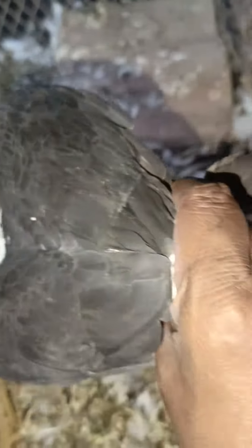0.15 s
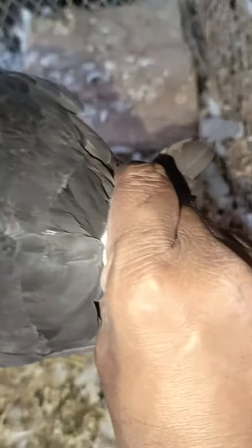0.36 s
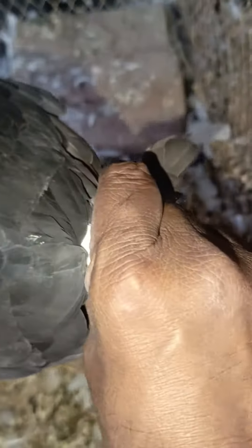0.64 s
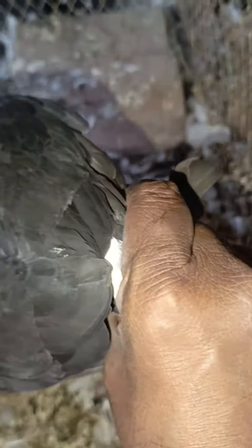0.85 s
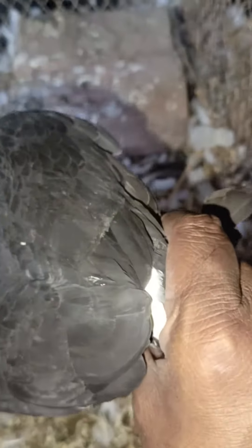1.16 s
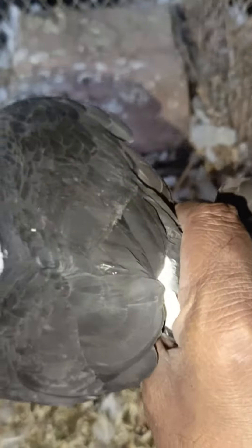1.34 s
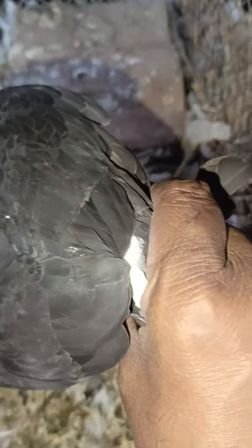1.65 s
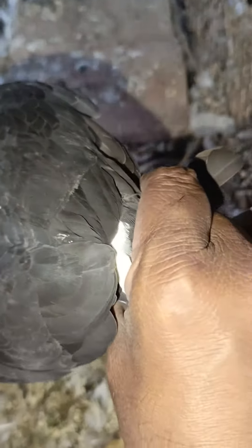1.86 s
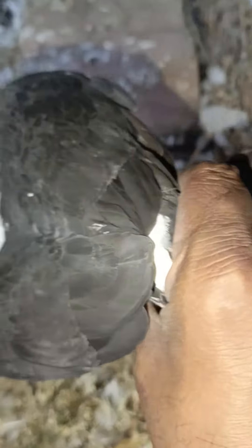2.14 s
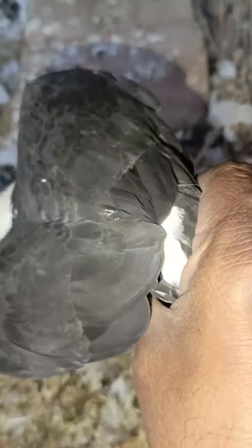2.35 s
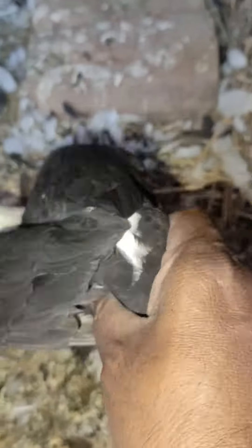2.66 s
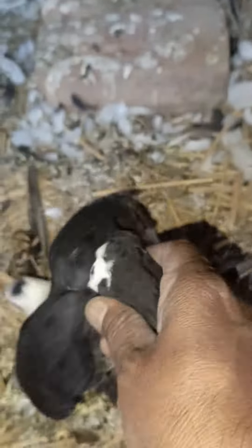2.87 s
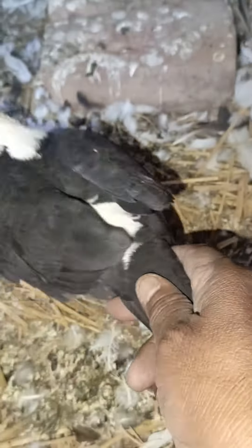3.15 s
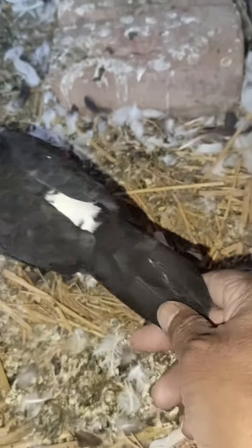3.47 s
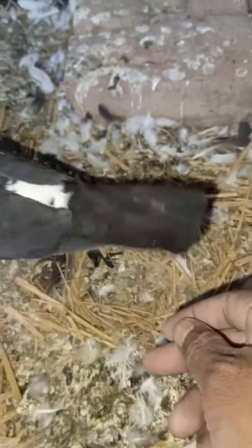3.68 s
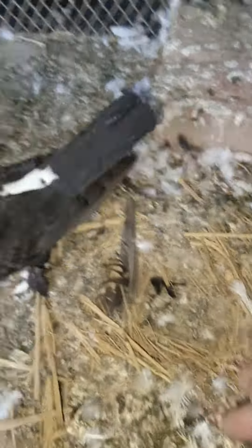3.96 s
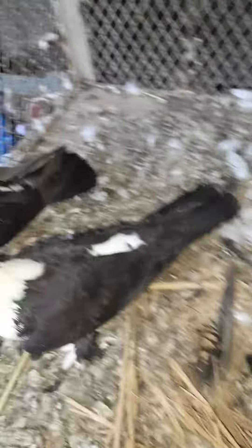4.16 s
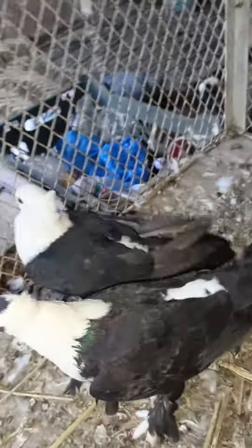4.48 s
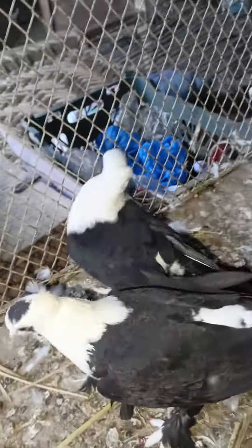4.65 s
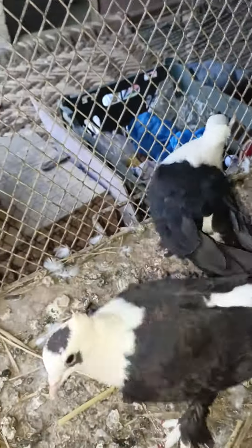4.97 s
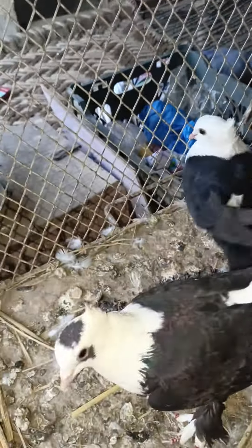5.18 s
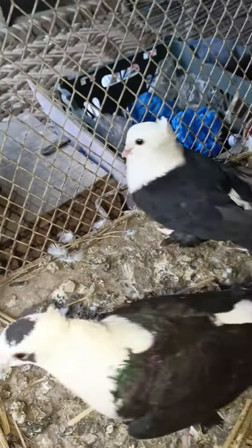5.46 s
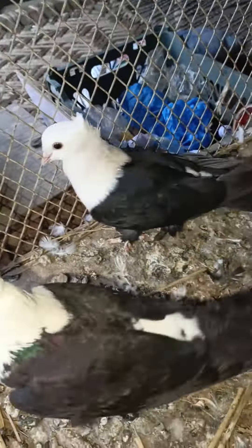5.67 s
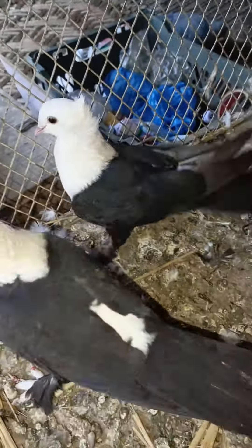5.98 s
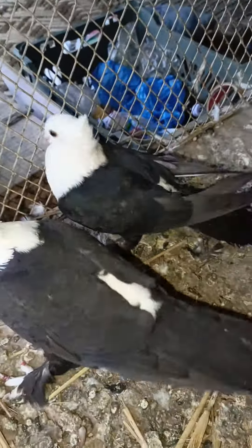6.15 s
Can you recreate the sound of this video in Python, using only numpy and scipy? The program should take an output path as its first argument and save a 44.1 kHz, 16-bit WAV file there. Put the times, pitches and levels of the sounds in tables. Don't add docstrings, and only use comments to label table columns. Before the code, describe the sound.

Short harsh bird screeches and quick chirps burst over low pigeon coos, straw rustling and mesh knocks in a hard-walled cage.

```python
import sys
import numpy as np
from scipy import signal
from scipy.io import wavfile
from scipy.ndimage import uniform_filter1d

SR = 44100
rng = np.random.default_rng(int(sys.argv[2]) if len(sys.argv) > 2 else 0)


def dump(signal):
    limited = np.clip(np.atleast_2d(signal).T, -1, 1)
    pcm = np.round(limited * 32767).astype(np.int16)
    wavfile.write(sys.argv[1], SR, pcm)


def volts_from_decibels(level):
    exponent = np.asarray(level, float) / 20
    return 10 ** exponent


N = 278712

# time in seconds, level in dB.
MURMUR = [(0.0, -29), (0.56, -32.5), (1.37, -32), (2.34, -34), (2.73, -32), (3.4, -37.5), (3.98, -31),
          (4.22, -33), (4.96, -34), (5.9, -33), (6.32, -39)]
# frequency in Hz, density in dB per Hz.
AIR = [(15, -60), (25, -74), (59, -25.5), (145, -8.5), (317, -3), (451, -1.5), (775, -14.5), (2410, -29),
       (4740, -22), (11600, -42.5), (13600, -83), (14800, -22), (16000, -35)]
AIR_DB = -34
# peak in seconds, reach in seconds, level in dB.
GUSTS = [(.15, 0.32, -45.5), (.55, 0.19, -50), (1.622, 0.18, -44), (2.13, 0.073, -58), (2.96, 0.069, -55),
         (2.27, .12, -50), (1.31, .05, -48), (2.75, .05, -54), (3.57, .04, -55), (4.8, .1, -55),
         (5.02, 0.1, -47), (5.2, 0.073, -49), (5.8, 0.24, -46.5), (6.0, 0.057, -42)]
CALM_DB = -68

# start in seconds, length in seconds, pitch in Hz, level in dB.
HOOTS = [(0., 0.098, 462, -23.5), (0.037, 0.13, 296, -32), (0.8, 0.035, 677, -30),
         (1.329, 0.17, 251, -38.5), (1.558, 0.091, 295, -30.5), (3.69, 0.16, 331, -31.5),
         (3.848, 0.35, 265.8, -31.5), (4.02, 0.1, 473, -28), (4.296, 0.11, 392, -34.5),
         (4.476, 0.27, 294.3, -33), (5.335, 0.38, 260, -39.5), (6.097, 0.044, 214, -34)]
# start in seconds, length in seconds, first and last pitch in Hz, level in dB.
ROLLS = [(0.896, 0.13, 337, 398, -30), (1.045, 0.35, 368.5, 331, -30.5), (1.707, 0.098, 389, 338, -36),
         (2.044, 0.11, 380.5, 354, -35), (2.203, 0.12, 358, 327, -35.5), (2.486, 0.063, 363, 349, -26),
         (2.562, 0.096, 382.3, 347, -24.5), (2.672, 0.17, 333.2, 388, -29), (2.93, 0.11, 449.6, 432, -30.5),
         (3.007, 0.179, 388.2, 364.3, -25), (4.791, 0.243, 322, 314.4, -32.5),
         (5.239, .16, 333.2, 366, -30.5), (5.422, 0.13, 351, 332, -31), (5.674, 0.15, 383.8, 349, -30.5),
         (5.805, 0.22, 425.5, 331.6, -28.5)]
ROLL_PEAK, ROLL_START_DB, ROLL_END_DB = 1, 3.5, -5.5

# peak in seconds, reach in seconds, shuffle in dB,
# near fizz in dB against the shuffle.
SCUFFLES = [(.0, 0.39, -39.5, -8), (.18, 0.047, -38, -23), (.56, 0.17, -33.5, -8), (.92, 0.14, -29, -10.5),
            (1.311, 0.017, -40, -20), (1.51, 0.12, -36, -9.5), (1.7, 0.051, -34.5, -13),
            (1.94, 0.15, -32, -8), (2.08, 0.11, -36, -22), (2.36, 0.091, -43, -15),
            (2.78, 0.47, -40, -11.5), (3.08, 0.16, -60, -21), (3.27, 0.053, -43.5, 4),
            (3.782, 0.053, -41.5, -13), (4.16, 0.063, -31, -11), (4.3, 0.098, -40, -17),
            (4.52, 0.13, -55, 3.5), (4.73, 0.14, -42, -25), (4.88, 0.26, -58, -5), (5.35, 0.25, -54, -8.5),
            (5.7, 0.6, -51.5, -8), (5.88, 0.12, -41, -9), (1.2, .1, -52, -10), (4.97, .08, -52, -10),
            (6.15, 0.083, -40.5, -10)]
BOUT_DROP_DB = -8
STILL_DB, STILL_FIZZ_DB = -58.5, -76
# frequency in Hz, density in dB per Hz.
STRAW = [(35, -26), (60, -27), (124, -5), (202, -21.5), (294, -4), (785, -11.5), (1200, -9.5), (1470, -12),
         (2300, -3), (3580, -11), (6430, -23.5), (11000, -42), (16000, -26)]

# start in seconds, snap in dB, thump in dB.
TAPS = [(0.0318, -25, -29.5), (0.0544, -27.5, -28), (0.1915, -13, -18), (0.2793, -23.5, -26.5),
        (0.3526, -28.5, -30.5), (0.3884, -27, -31.5), (0.5671, -38, -21.5), (1.7065, -24, -21.5),
        (2.5684, -61.5, -32), (2.6065, -29.5, -30), (2.6544, -30.5, -33.5), (2.9134, -16.5, -24.5),
        (3.7309, -36.5, -37), (.0957, -30, -33), (.173, -26, -30), (1.8622, -26, -36), (2.582, -44, -38),
        (3.09, -39, -40), (5.3502, -33, -37), (5.37, -36, -40), (5.392, -29, -44), (5.44, -34, -40),
        (5.458, -34, -40), (5.68, -36, -40), (5.71, -39.5, -37), (2.8794, -25, -42), (5.1253, -31, -48),
        (5.5937, -30, -31.5), (5.6176, -31, -33)]
# start in seconds, snap in dB, thump in dB.
SCUFFS = [(0.1201, -23.5, -25), (0.5362, -18.5, -31), (1.3264, -24.5, -28), (1.3488, -26, -30.5),
          (1.4614, -30, -35), (1.4964, -23.5, -27), (1.5614, -26, -25), (1.6342, -16, -18),
          (1.8302, -45, -35), (2.3785, -26, -64), (2.5481, -33, -43), (2.9744, -40, -26),
          (3.1314, -37.5, -30.5), (4.3344, -22, -28), (4.5344, -24, -46), (4.8094, -39, -30),
          (5.0185, -33.5, -38), (6.0367, -30.5, -34), (6.2856, -36.5, -41)]
TAP_T60_S, SCUFF_T60_S = 0.042, 0.2
TAP_TICK, SCUFF_TICK = 2.3, 1.2

# start in seconds, length in seconds, first pitch in Hz, last pitch in Hz,
# peak effort in dB. All call tables down to SLUMPS have these columns.
SCREECHES = [
    (0.706, 0.11, 1153, 1193, -14),
    (1.871, 0.12, 1097, 1192, -14.5),
    (2.036, 0.1, 1185, 1220, -14),
    (3.272, 0.12, 1127, 1208, -13.5),
    (3.418, 0.118, 1147, 1222, -14.5),
    (5.749, 0.13, 1125, 1169, -29.5),
]
RASPS = [(.11, 0.12, 1450, 1405, -32), (.612, 0.12, 1207, 1464, -22), (.893, 0.07, 1245, 1481, -19.5),
         (.95, 0.083, 1434, 1352, -21.5), (4.16, 0.067, 1272, 1474, -18), (4.215, 0.085, 1251, 1416, -18.5),
         (4.432, .16, 1203, 1456, -21.5), (4.5, 0.055, 1568, 1500, -27), (4.436, .12, 1165, 1181, -25),
         (.62, .09, 1160, 1175, -29), (5.145, 0.057, 1765, 1790, -32)]
PEEPS = [
    (.4, 0.071, 2925, 2797, -23),
    (.43, 0.058, 3910, 3950, -29.5),
    (2.805, 0.079, 2460, 2690, -24),
    (2.85, 0.05, 3130, 3220, -23),
    (4.633, 0.019, 2840, 3430, -15),
    (4.643, 0.025, 3460, 3470, -16),
    (4.662, 0.0092, 3440, 2730, -11),
]
MEWS = [
    (5.33, .2, 1780, 1888, -32),
]
SWELLS = [
    (2.71, 0.11, 2100, 2320, -31),
    (3.1, 0.2, 3040, 2797, -32),
    (3.15, 0.077, 2040, 2340, -32),
    (3.21, .065, 3000, 2820, -28),
]
SWOOPS = [
    (3.912, .093, 1749, 2423, -15),
    (4.205, 0.0645, 2295, 2505, -19.5),
]
STACKS = [
    (.44, 0.151, 1132, 1098, -19.5),
]
GROANS = [
    (3.885, 0.048, 830, 845, -22.5),
    (4.065, 0.092, 815, 852.6, -27),
    (3.16, .08, 940, 915, -42),
]
SQUAWKS = [
    (4.619, 0.02, 1370, 1382, -14.5),
    (4.669, 0.025, 1356, 1290, -18),
]
PIPES = [(.78, .08, 2000, 1950, -32), (.9, .08, 1750, 1600, -32), (2.13, .042, 2485, 2606, -23),
         (2.46, .069, 4730, 4460, -50), (2.77, .07, 2300, 2250, -32), (3.725, .079, 1950, 1800, -39),
         (4.07, .084, 2200, 2300, -38), (4.705, .016, 1770, 1700, -28), (4.74, .03, 3200, 2800, -35),
         (4.765, .065, 3300, 1800, -37), (5.045, .06, 1518, 1478, -44), (5.06, .061, 4820, 4770, -46),
         (5.165, .05, 3310, 2110, -41), (5.757, .13, 2300, 2330, -36)]
DIVES = [
    (1.125, .041, 3410, 2540, -35),
    (2.178, .088, 2677, 1503, -16),
    (4.0, .06, 2390, 1753, -17),
    (4.005, .031, 3130, 2380, -26),
    (5.14, .031, 5000, 3370, -33.5),
]
SLUMPS = [
    (4.295, .05, 1450, 1110, -20),
    (4.318, .03, 3600, 2800, -25),
    (4.522, .025, 5300, 4300, -23),
    (4.598, .024, 3150, 2760, -27),
]
YELP_AFTER_S, YELP_S, YELP_HZ, YELP_END_HZ, YELP_DB = .021, .05, 3800, 3150, -6

# peak as share of length, pitch travelled by then as share,
# start in dB, end in dB, overtone fall in dB per octave, odd overtones in dB.
SCREECH = (0.4, 0.8, -5, -15, 1, 0)
RASP = (0.32, 1.17, -2, -7, 2.5, -6.5)
PEEP = (0.64, 0.96, -5, -7.5, 2.5, -4)
MEW = (0.28, 0.66, -4.5, -12, 0, 7)
SWELL = (0.57, 1, -13, -3, -10.5, 20)
SWOOP = (0.5, 0.9, -1, -1, -5.5, -0.5)
YELP = (0.4, .75, -1, -2, 1.5, -3)
STACK = (0.64, 0.7, -8, -16, 0.5, 1.5)
GROAN = (.5, 1, 3, 2.5, -10.5, 1)
SQUAWK = (-1, 0.8, -7, -7, 0.5, 1)
PIPE = (-0.5, 0.04, 8.5, -9.5, -9.5, 9)
DIVE = (.45, .55, -1, -5, -3.5, -7)
SLUMP = (.45, .45, -2, -4, -2, -3)
HOARSE = dict(screech=.3, rasp=.34, peep=.26, mew=.28, swell=.36, swoop=.36, yelp=.32, stack=.06, groan=.21, squawk=.24, pipe=.24, dive=.22, slump=.2)
# favoured frequency in Hz, lift in dB, onset in seconds, echo in dB.
THROAT = dict(screech=(4750, 9.5, .019, -3.5), rasp=(2900, 2.5, .007, -5), peep=(3100, 0, 0, -6),
          mew=(1850, 5.5, 0.06, -4), swell=(2400, 5, 0.1, -2.5), swoop=(2400, 4.5, .02, -4.5),
          yelp=(3398, 3, 0.03, -3), stack=(4450, 6, 0, -3.5), groan=(1900, 4, .011, -4.5),
          squawk=(3500, -0.5, -0.03, -8), pipe=(2200, 8, -0.04, -3.5), dive=(3696, 5, 0.06, -3.5),
          slump=(2600, 5, .004, -6))
THROAT_OCTAVES = 0.28
# frequency in Hz, gain in dB.
BEAK = [(410, -62), (700, -32.5), (1180, -11.5), (2350, -8.5), (2770, -1), (3070, -4), (4100, -2.5),
        (4860, -1), (5470, -8), (6570, -9.5), (8530, -25.5), (12000, -31), (14800, -34.5), (16000, -21)]

DUCK_FROM_DB, DUCK_SHARE, DUCK_BACK_DB_PER_S = -24.5, 0.22, 36
GATE_REACH_DB, GATE_DEPTH_DB, GATE_FROM_HZ = 5, 2.8, 650


def evened(x):
    return x / np.sqrt(np.mean(x ** 2) + 1e-20)


def colour(x, points):
    point_hz, point_db = np.transpose(points)
    hz = abs(np.fft.fftfreq(4096, 1 / SR))
    gain_db = np.interp(np.log(hz + 1), np.log(point_hz), point_db)
    log_gain = np.log(volts_from_decibels(np.maximum(gain_db, -100)))
    taps = np.fft.ifft(np.exp(np.conj(signal.hilbert(log_gain)))).real[:2048]
    return signal.oaconvolve(x, taps)[:len(x)]


def band(x, low_hz, high_hz):
    edges_hz = [low_hz, min(high_hz, SR / 2 - 1000)]
    return signal.sosfilt(signal.butter(2, edges_hz, "band", fs=SR, output="sos"), x)


def wander(count, hz):
    knots = rng.standard_normal(count // 8 + 2)
    path = np.interp(np.arange(count) * hz / SR, np.arange(len(knots)), knots)
    return uniform_filter1d(path, max(int(SR / hz / 2), 1))


def spread(rows):
    s, *columns = np.transpose(rows)
    t = np.arange(s[0], s[-1], 1 / SR)
    return [np.interp(t, s, c) for c in columns]


def add(mix, s, sound):
    part = mix[round(s * SR):][:len(sound)]
    part += sound[:len(part)]


def arch(s, length, first_hz, last_hz, level_db, peak, bend, start_db, end_db):
    peak_s = s + np.clip(peak, .05, .95) * length
    peak_hz = first_hz + bend * (last_hz - first_hz)
    return [(s, first_hz, level_db + start_db), (peak_s, peak_hz, level_db),
            (s + length, last_hz, level_db + end_db)]


def bouts(s, reach, level_db, still_db):
    t = np.arange(0, N / SR + .01, .002)
    away = abs(t[:, None] - s) / np.maximum(reach, .01)
    power = volts_from_decibels(2 * still_db) + volts_from_decibels(2 * (level_db + BOUT_DROP_DB * away ** 1.47)).sum(axis=1)
    return np.interp(np.arange(N) / SR, t, 10 * np.log10(power))


def flock():
    z = signal.stft(colour(rng.standard_normal(N), AIR), nperseg=1024)[2]
    patches = uniform_filter1d(rng.standard_normal(z.shape), 5, axis=0)
    patches = evened(uniform_filter1d(patches, 5, axis=1))
    wash = evened(signal.istft(z * volts_from_decibels(2.7 * patches), nperseg=1024)[1][:N])
    draught = evened(band(wash, 36, 102)) * volts_from_decibels(2 * wander(N, 9.7))
    draught *= volts_from_decibels(bouts(*np.transpose(GUSTS), CALM_DB))
    murmur_db = np.interp(np.arange(N) / SR, *np.transpose(MURMUR))
    murmur = volts_from_decibels(murmur_db) * band(band(wash, 121, 485), 121, 690)
    air = volts_from_decibels(AIR_DB - 14 + 1.1 * wander(N, 4.)) * band(wash, 400, 20000)
    return draught + murmur + air


def hoot(length, hz, level_db):
    count = round(length * SR)
    turns = np.cumsum(hz * (1 + 0.035 * wander(count, 25.0))) / SR
    tone = np.sqrt(2) * np.sin(2 * np.pi * turns)
    return volts_from_decibels(level_db + 0.94 * wander(count, 26.4)) * tone * signal.windows.tukey(count, .4)


def rustle():
    s, reach, level_db, bright_db = np.transpose(SCUFFLES)
    fizz_db = bouts(s, reach, level_db + bright_db, STILL_FIZZ_DB)
    shuffle_db = bouts(s, reach, level_db, STILL_DB)
    crack_size = volts_from_decibels(7.5 * np.minimum(rng.exponential(1, N), 5))
    crackle = crack_size * (rng.random(N) < 1500 / SR) * rng.choice([-1, 1], N)
    stir = (.5 * evened(crackle) + rng.standard_normal(N)) * volts_from_decibels(3.2 * wander(N, 45.))
    straw = colour(stir, STRAW)
    fizz = 4.05 * evened(band(straw, 2430, 18000))
    shuffle = 1.904 * evened(band(straw, 240, 3590))
    return volts_from_decibels(fizz_db) * fizz + volts_from_decibels(shuffle_db) * shuffle


def knock(snap_db, thump_db, t60, tick):
    t = np.arange(round(.3 * SR)) / SR
    burst = colour(rng.standard_normal(len(t)), STRAW)
    snap = evened(band(burst, 3950, 24600))
    thump = evened(band(burst, 113, 2780))
    snap[40] += 4.0
    decay = volts_from_decibels(-60 * t / max(t60, .01)) + tick * volts_from_decibels(-60 * t / 0.013)
    decay *= np.minimum(t / 0.0023, 1)
    return decay * (0.53 * volts_from_decibels(snap_db) * snap + 0.82 * volts_from_decibels(thump_db) * thump)


def chirp(rows, hoarse, fall_db, odd_db, throat_hz, lift_db, onset):
    hz, effort_db = spread(rows)
    count = len(hz)
    t = np.arange(count) / SR
    turns = np.cumsum(hz * (1 + (.003 + .085 * hoarse) * wander(count, 300.))) / SR
    tone = np.zeros(count)
    for k in range(1, 15):
        throat_db = lift_db * np.exp(-(np.log2(k * hz / throat_hz) / THROAT_OCTAVES) ** 2)
        overtone_db = fall_db * np.log2(k) + odd_db * (k % 2) + 3.17 * wander(count, 88.8) + throat_db
        tone += volts_from_decibels(overtone_db) * np.cos(2 * np.pi * k * turns) * (k * hz < 16000)
    puffs = (0.29 + np.exp(-(turns % 1) / 0.71)) * rng.standard_normal(count)
    puffs = colour(puffs, [(1000, 0), (16000, 4 * fall_db)])
    breath = np.minimum(t / 0.0048, 1)
    hiss = hoarse * breath * evened(band(colour(puffs, BEAK), .8 * hz.min(), 20000))
    voice = (1 - hoarse) * evened(colour(tone, BEAK)) + .9 * hiss
    flutter = volts_from_decibels(12.4 * hoarse * wander(count, 117.0))
    opening = np.minimum(t / max(onset, .002), 1)
    fade = signal.windows.tukey(count, min(0.013 * SR / count, 1))
    return opening * volts_from_decibels(effort_db) * evened(voice * flutter) * fade


def small_birds():
    yelps = [(s + YELP_AFTER_S, YELP_S, YELP_HZ, YELP_END_HZ, db + YELP_DB) for s, *_, db in SCREECHES]
    kinds = dict(screech=(SCREECHES, SCREECH), rasp=(RASPS, RASP), peep=(PEEPS, PEEP), mew=(MEWS, MEW),
                 swell=(SWELLS, SWELL), swoop=(SWOOPS, SWOOP), yelp=(yelps, YELP), slump=(SLUMPS, SLUMP),
                 stack=(STACKS, STACK), groan=(GROANS, GROAN), squawk=(SQUAWKS, SQUAWK),
                 pipe=(PIPES, PIPE), dive=(DIVES, DIVE))
    near, far = np.zeros((2, N))
    for name, (calls, (*shape, fall_db, odd_db)) in kinds.items():
        *throat, echo_db = THROAT[name]
        for row in calls:
            call = chirp(arch(*row, *shape), HOARSE[name], fall_db, odd_db, *throat)
            add(near, row[0], call)
            add(far, row[0], volts_from_decibels(echo_db) * call)
    return band(np.array([near, far]), 330, 17000)


def roll(rows):
    hz, level_db = spread(rows)
    count = len(hz)
    beat = np.cumsum(23.64 * (1 + 0.34 * wander(count, 17.2))) / SR
    throb = 1 + 0.5 * np.cos(2 * np.pi * beat)
    turns = np.cumsum(hz * (1 + 0.085 * wander(count, 35.))) / SR
    tone = np.sin(2 * np.pi * turns) + volts_from_decibels(-27.5) * np.sin(4 * np.pi * turns)
    level = volts_from_decibels(level_db + 1.9 * wander(count, 11.0))
    return level * evened(throb * tone) * signal.windows.tukey(count, .15)


def walls(x, t60, treble_t60):
    taps, at = np.zeros(SR // 2), np.arange(200, SR // 2 - 20, 20)
    taps[at + rng.integers(0, 20, len(at))] = rng.choice([-1., 1.], len(at))
    hz, t, z = signal.stft(taps, SR, nperseg=256)
    t60_by_hz = np.interp(hz, [3000, 12000], [t60, treble_t60])[:, None]
    tail = signal.istft(z * volts_from_decibels(-60 * t / t60_by_hz), SR, nperseg=256)[1]
    return signal.fftconvolve(x, tail / np.linalg.norm(tail))[:N]


def ducking(loud):
    power_db = 10 * np.log10(abs(uniform_filter1d(loud ** 2, 800)) + 1e-12)
    back_db = np.arange(N) * DUCK_BACK_DB_PER_S / SR
    held_db = np.maximum.accumulate(power_db + back_db) - back_db
    over_db = np.maximum(held_db - DUCK_FROM_DB, 0)
    return volts_from_decibels(-DUCK_SHARE * uniform_filter1d(over_db, 400))


def gate(x):
    hz, _, z = signal.stft(x, SR, nperseg=512)
    power = uniform_filter1d(uniform_filter1d(abs(z) ** 2, size=5, axis=1), size=4, axis=2)
    level_db = 10 * np.log10(power + 1e-16)
    over_db = level_db - np.percentile(level_db, 12, axis=2, keepdims=True)
    cut_db = GATE_DEPTH_DB * np.clip(1 - over_db / GATE_REACH_DB, 0, 1.6)
    cut_db = cut_db * (hz > GATE_FROM_HZ)[:, None]
    return signal.istft(z * volts_from_decibels(-cut_db), SR, nperseg=512)[1][:, :N]


def scene():
    small, sent = small_birds()
    doves, hits = np.zeros((2, N))
    for s, *row in HOOTS:
        add(doves, s, hoot(*row))
    for row in ROLLS:
        add(doves, row[0], roll(arch(*row, ROLL_PEAK, ROLL_PEAK, ROLL_START_DB, ROLL_END_DB)))
    for s, *row in TAPS:
        add(hits, s, knock(*row, TAP_T60_S, TAP_TICK))
    for s, *row in SCUFFS:
        add(hits, s, knock(*row, SCUFF_T60_S, SCUFF_TICK))
    echo = walls(sent + volts_from_decibels(-7.0) * doves + volts_from_decibels(-9.5) * hits, t60=0.33, treble_t60=0.17)
    background = ducking(small) * (flock() + rustle())
    return (small + volts_from_decibels(-5.5) * doves + hits + echo + background)[None]


def top_cut(x):
    return signal.sosfilt(signal.butter(12, 16920, fs=SR, output="sos"), x)


def record(dry):
    limited = .85 * np.tanh(dry / .85)
    held = gate(band(band(limited, 40, 20000), 26, 20000))
    low_pass = signal.firwin(255, 15950, window=("kaiser", 8), fs=SR)
    mix = signal.oaconvolve(held, low_pass[None], "same")
    return top_cut(mix)


dry = scene()
out = record(dry)
dump(out)
```